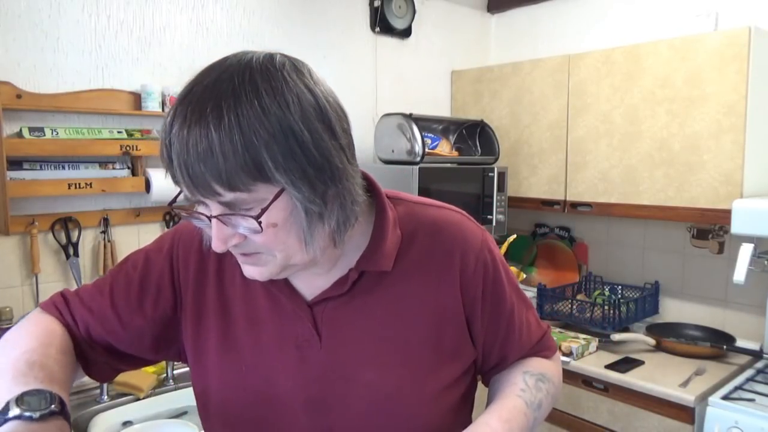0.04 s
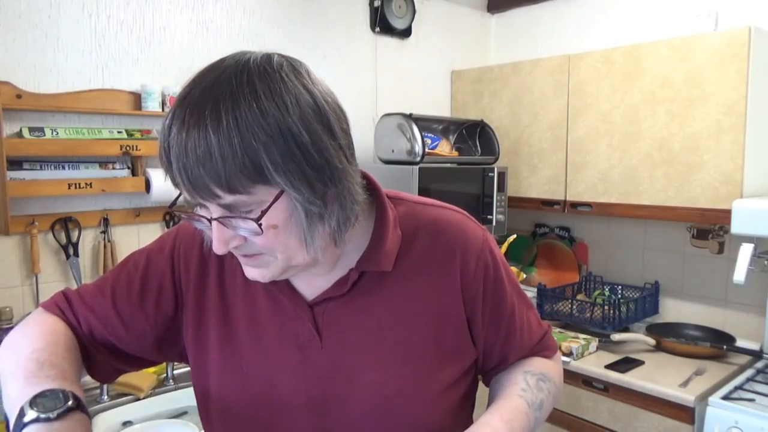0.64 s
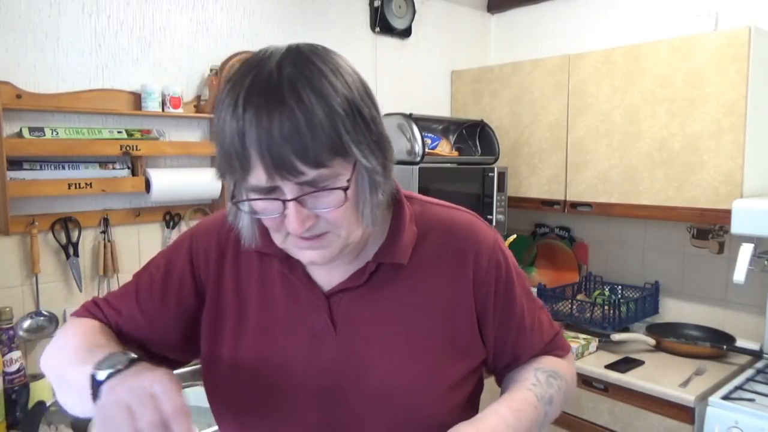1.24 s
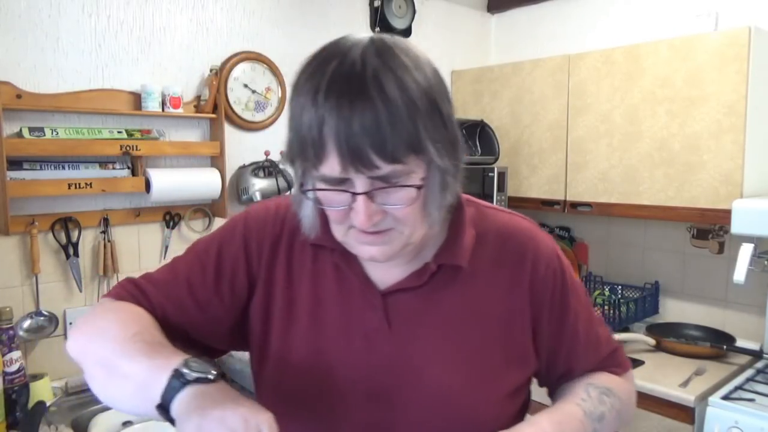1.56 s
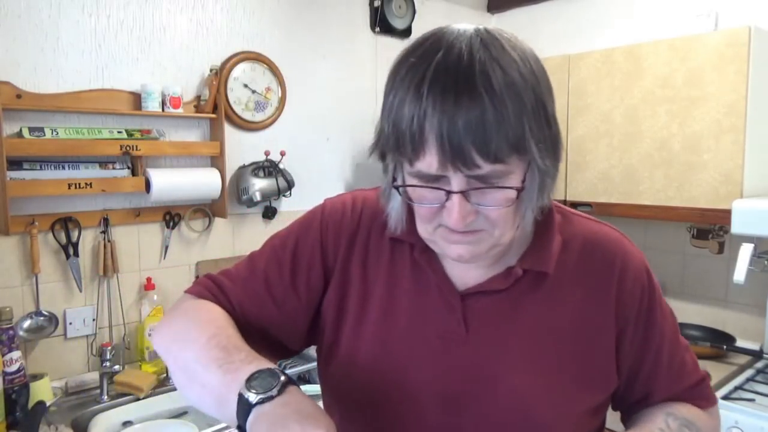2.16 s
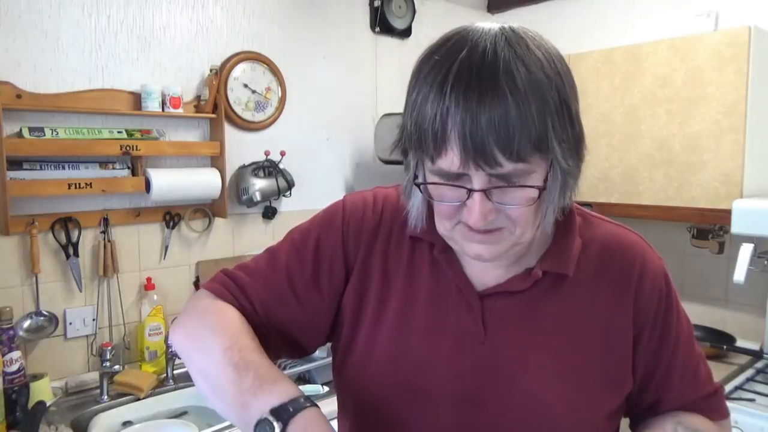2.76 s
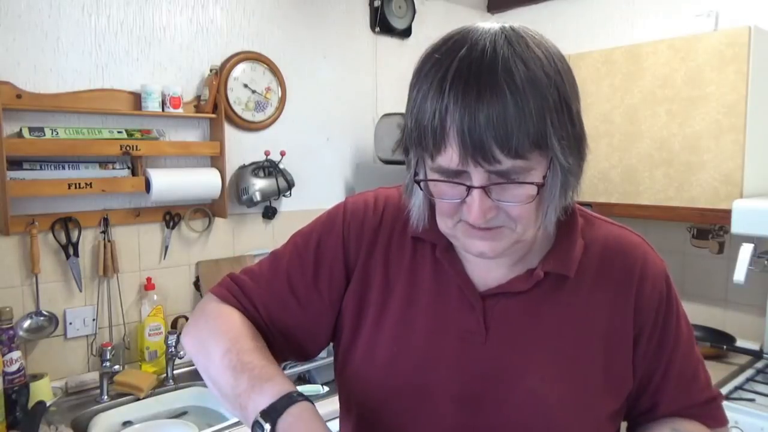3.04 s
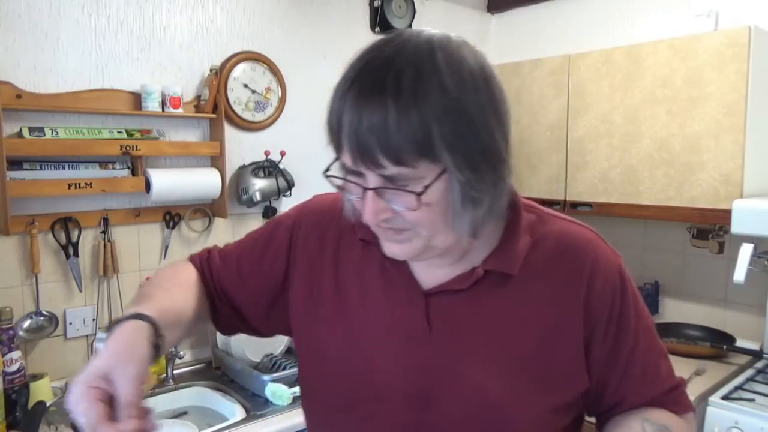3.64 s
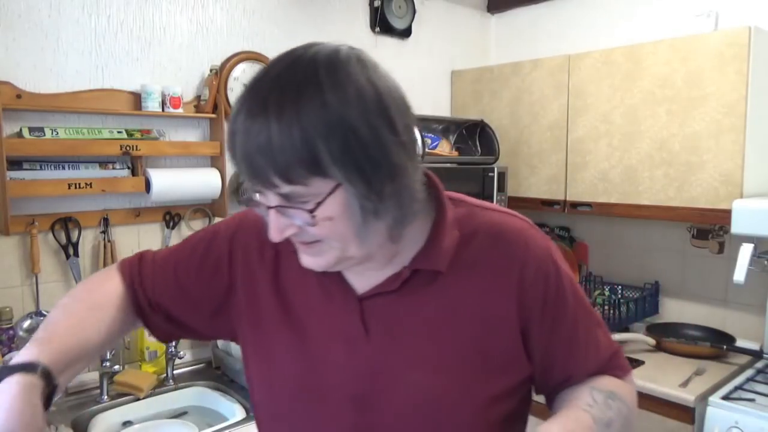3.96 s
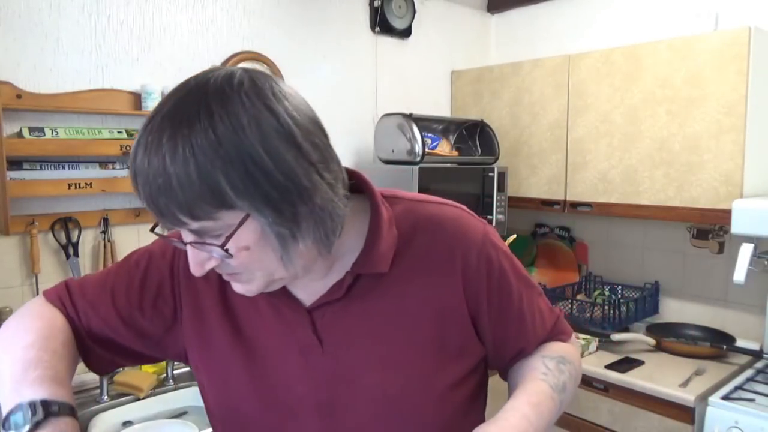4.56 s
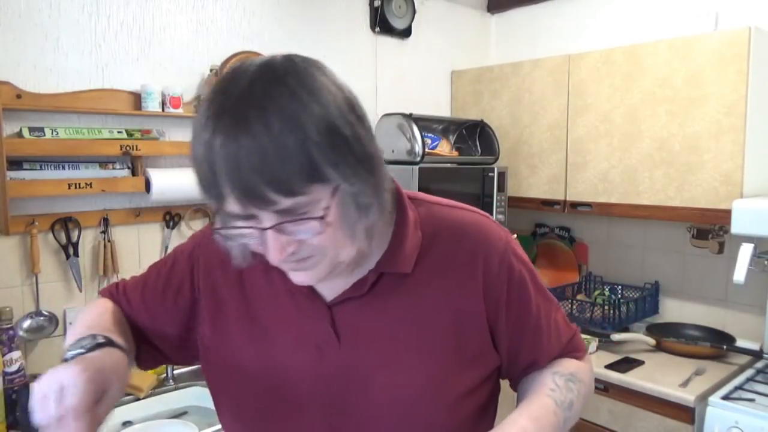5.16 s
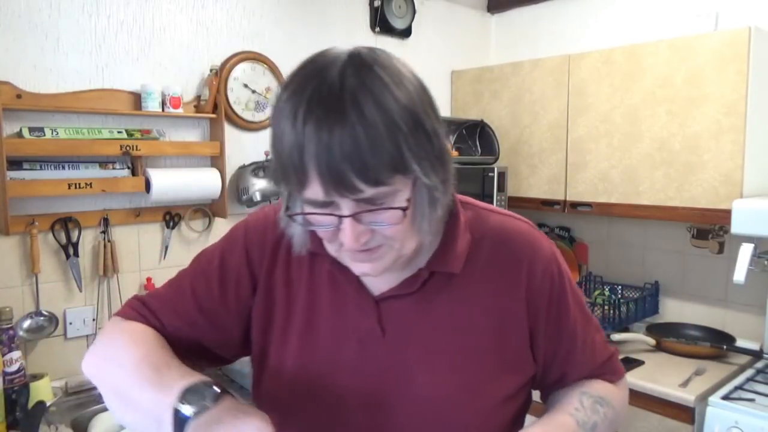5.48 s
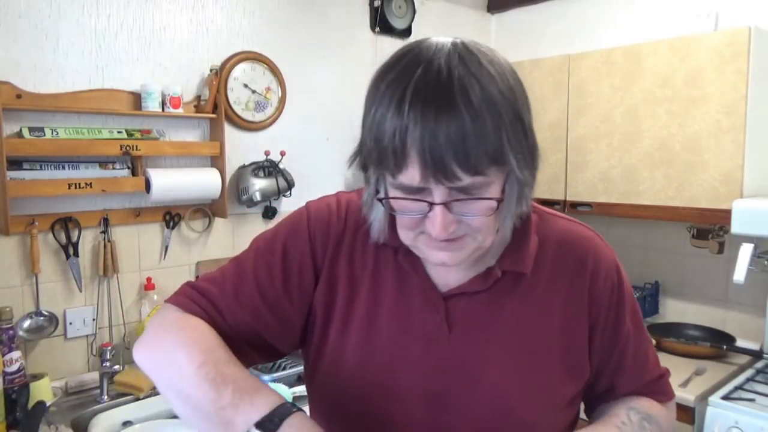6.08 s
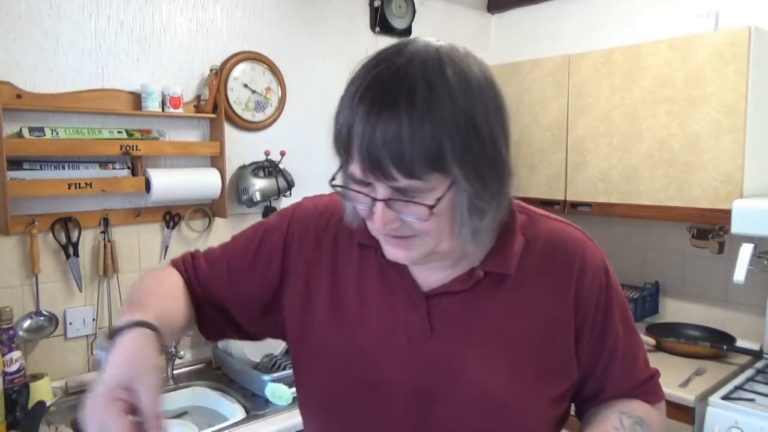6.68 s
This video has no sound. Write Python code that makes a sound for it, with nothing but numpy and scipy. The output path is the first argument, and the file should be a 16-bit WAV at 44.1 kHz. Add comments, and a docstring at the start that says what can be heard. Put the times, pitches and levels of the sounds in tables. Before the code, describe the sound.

Dishes are handled close to the microphone at a sink in a small tiled kitchen, over the constant hum and soft rush of an appliance fan. A dull, groaning slide of crockery comes first, followed by a sharp knock and a gritty scrape in the basin. Another slide leads into a ringing clink of cutlery. Near the end a dish clatters down with a spoon inside and scrapes briefly.

```python
"""Washing-up in a small tiled kitchen, over the mains hum and fan of an appliance.
Twice a piece of crockery is dragged closer; a dish knocks into the sink and scrapes along it,
and a piece of steel cutlery is dropped onto other cutlery. The hard walls ring briefly."""
import sys
import numpy as np
from scipy import signal
from scipy.fft import rfft, irfft, next_fast_len
from scipy.io import wavfile
from scipy.ndimage import map_coordinates

SR = 44100
rng = np.random.default_rng(int(sys.argv[2]) if len(sys.argv) > 2 else 0)


def to_wav(s):
    """Save 16-bit WAV."""
    ch = np.atleast_2d(s).T  # columns
    pcm = np.round(np.clip(ch, -1, 1) * 32767)  # PCM
    wavfile.write(sys.argv[1], SR, pcm.astype(np.int16))


N = 300759

# the dish against the sink: (Hz, dB, t60 s)
DISH = [(527, -56, 0.16), (600.6, 4.5, 0.36), (642, -6.5, 0.2), (693, -17, 0.12), (994, -12.5, 0.25), (1142, 5.5, 0.24),
        (1244, 0, 0.25), (1303, -5, 0.17), (1795, -9, 0.2), (1870, -6, 0.17), (1980, -6, 0.17), (2110, -7, 0.12),
        (2260, -2, 0.17), (2320, -11, 0.16), (2800, -17, 0.12), (3175, -9, 0.26), (3240, -10, 0.34),
        (4200, -20, 0.2), (4620, -7, 0.078), (4900, -13, 0.13)]
# the dish lands: (s, level dB, favoured Hz, rim crack dB, loss per rock dB, share of the full ring time)
KNOCKS = [(2.596, -12.5, 950, 6.5, 7, 0.19), (2.8189, -31.5, 1200, 2, 18, 0.19), (5.805, -12, 600, 8.5, 1.74, 0.54)]
CRACK = [(60, -50), (200, -29), (500, -18), (1500, -12), (2000, 10.5), (4000, 2.5), (6000, 5.5), (6800, -3.5), (8500, -6), (11000, -22)]  # the hard edge of a contact: (Hz, dB)
# steel cutlery: (Hz, dB, t60 s)
STEEL = [(1303, -34, 0.38), (2046, -26, 0.29), (2862, -19, 0.24), (3027, -26, 0.3), (3593, -22, 0.26),
         (3839, -24, 0.4), (3989, -28, 0.37), (4283, -27, 0.31), (4903, -26, 0.38), (5075, -23, 0.35),
         (5187, -23, 0.34), (5452, -22, 0.31), (5887, -21, 0.31), (6082, -19, 0.3), (6273, -19, 0.29),
         (6426, -22, 0.29), (6684, -27, 0.31), (6825, -27, 0.29), (7205, -23, 0.28), (7321, -24, 0.28),
         (7435, -25, 0.28), (7628, -28, 0.28), (8197, -27, 0.3), (8538, -23, 0.26), (8689, -24, 0.25),
         (9505, -30, 0.28), (9994, -26, 0.22), (10134, -26, 0.23)]  # fixed
# its free ends sing on: (Hz, dB, t60 s)
SING = [(3592, -48, 1.7), (3843, -46, 1.53), (6090, -42, 0.89), (8490, -53, .9)]
# steel meets steel: (s, level dB, favoured Hz, crack dB, share of the full ring time)
CLINKS = [(4.470, -45, 11000, 10.5, .2), (4.5154, -13, 4800, -5.5, 0.53)]
JANGLE = [(60, -60), (800, -10.5), (2500, -13), (4500, -1), (6200, -9), (11000, -5.5)]  # the tick of steel on steel: (Hz, dB)
# pushes of the dish along the sink: (s at its height, ring dB, hiss dB)
SCRAPES = [(2.773, -34, -42), (2.84, -36, -46.5), (2.93, -43.5, -53), (6.201, -44.5, -35.5), (6.288, -61, -43.5)]
HISS = [(1180, -32), (2000, -4), (2240, -21), (2460, -22), (3250, -15), (3510, -23), (4050, -2), (4510, -28),
        (4980, -4), (5430, 1.5), (6870, -9), (9470, 0), (11000, -27.5), (14300, -40), (22000, -120)]  # (Hz, dB)
# crockery dragged over the worktop: (s at its height, friction dB)
DRAGS = [(0.848, -35.5), (4.205, -32)]
DRAG_BODY = [(240, -55), (400, -15.5), (512, -8), (561, -15.5), (897, -10), (1060, -28), (1290, -13.5), (1590, -37),
             (1860, -29), (2010, -32), (4880, -57), (5340, -38.5), (6250, -36.5), (9000, -55), (11700, -85),
             (19800, -120)]  # (Hz, dB)
# the drag catches and a resonance groans: (s at its height, Hz, dB)
GROANS = [(0.867, 482, -25), (0.886, 735, -34), (0.936, 488, -32.5), (0.939, 735, -24.5), (0.94, 978, -36), (4.226, 514, -25)]
QUIET = [(1.1, 2.5), (3.1, 4.1), (5.0, 5.7)]
AIR = [(260, -33), (450, -4), (508, -1), (663, -10), (728, -4), (964, -13.5), (1130, -8), (1500, -15), (1930, -14),
       (3390, -20), (3930, -22.5), (4310, -20.5), (6360, -21.5), (10400, -33), (11000, -54), (14300, -60), (22000, -120)]  # the fan's rush: (Hz, dB)
AIR_DB = -49
RUMBLE = [(25, -22), (40, -25), (60, -6), (77, 0.5), (130, -2.5), (200, -5.5), (300, -14.5), (450, -6), (600, -33)]  # (Hz, dB)
CASING = [(245.4, 12, -55.5), (303.6, 9.5, -50), (339.6, 21.4, -44.5), (388, 18.7, -42.5), (1115, 59, -61)]  # the appliance's panels: (Hz, width Hz, dB)
KITCHEN = [(200, 0.65), (1000, 0.26), (4000, 0.3), (10000, 0.29)]  # (Hz, t60 s)
TOP_HZ = 11050  # fixed
TIME = np.arange(N) / SR
# a spoon that jumps in the dish: (Hz, dB, t60 s)
SPOON = [(6160, -9, 0.14), (6200, 0, 0.21), (6600, -13, 0.15), (7130, -8, 0.14), (7500, -7, 0.16), (8720, -6.5, 0.15),
         (10930, -11, 0.098)]
SINK = [(560, -9, 0.13), (580, -5.5, 0.44), (1108, -4, 0.22), (1160, -13, 0.12), (1300, -5.5, 0.14), (1815, -5, 0.15), (1870, -15, 0.12), (2720, -13.5, 0.16), (3130, -16, .1)]  # the scraped basin: (Hz, dB, t60 s)
# faint rubs of hands and sleeves: (s at its height, Hz, dB)
RUBS = [(0.31, 6650, -58.5), (0.88, 3300, -55), (1.22, 7200, -61), (1.78, 3900, -59), (5.23, 8040, -63), (5.45, 7850, -59)]
RIM_DB, RIM_HZ, RIM_LIFE, RIM_LEAD_S = -13, 4470, 0.24, .0025  # the rim touches just before the body
SETTLE_S, SETTLE_DB, SETTLE_LIFE = .097, -7, 0.98  # a last soft contact, after which the dish rings freely
PUSH_RISE_DB_PER_S, PUSH_FALL_DB_PER_S = 181, 290
SQUEAL = [(5480, 36, 3), (5870, 41, 4), (6630, 30, -1.5), (7200, 110, 0), (8140, 93, -12), (9800, 97, -9),
          (10700, 59, -3)]  # thin steel tones in the scrape: (Hz, width Hz, dB)
DRAG_RISE_DB_PER_S, DRAG_FALL_DB_PER_S = 432, 114
GROAN_HALF_S = 0.015
RUB_HALF_S = .027
ROCK_S, ROCK_GROWTH, ROCK_DB, ROCK_LIFE = .0145, 0.89, -1.7, .33  # first rocking gap, next gap over it, level against the landing, share of ring time
# the spoon jumps: (s, level dB, favoured Hz, crack dB, share of the full ring time)
TAPS = [(2.8195, -35.5, 8700, 7.5, .35), (5.8048, -17.5, 6200, 1.5, 0.37)]
GRAZE_LEAD_S, GRAZE_CRACK_DB, GRAZE_LIFE = .0052, -10, 0.46  # things brush just before they hit
GRAZE_DB = -22  # fixed
BODY_CRACK_DB, ROCK_CRACK_DB = -11.5, -9  # the body lands softly; it rocks on its hard foot


def amp(db):
    """Decibels to gain."""
    return 10 ** (np.asarray(db) / 20)


def unit(x):
    """Scaled to rms 1."""
    return x / np.sqrt(np.mean(x ** 2) + 1e-20)


def along(points, hz):
    """(Hz, value) points read on a log axis."""
    f, v = np.transpose(points)
    return np.interp(np.log(hz + 1), np.log(f + 1), v)


def filtered(x, response):
    """x times a response of frequency."""
    n = x.shape[-1]
    m = next_fast_len(n + SR // 4)
    return irfft(rfft(x, m) * response(np.fft.rfftfreq(m, 1 / SR)), m)[..., :n]


def noise(spectrum, size=N):
    """Coloured noise of rms 1."""
    return unit(filtered(rng.standard_normal(size), lambda hz: amp(along(spectrum, hz))))


def wobble(rate):
    """A smooth random curve, rate knots a second."""
    return map_coordinates(rng.standard_normal(int(N * rate / SR) + 4), [TIME * rate])




def add(track, s, sound):
    """Mix a sound in at time s."""
    part = track[round(s * SR):][:len(sound)]
    part += sound[:len(part)]


def ring(modes, life):
    """One second of fading modes, starting at rms 1, a little different for each blow."""
    hz, db, t60 = np.transpose(modes)[:, :, None]
    t = np.arange(SR) / SR
    size = amp(db + .5 * rng.standard_normal(hz.shape))
    waves = np.sin(2 * np.pi * (hz * t + rng.random(hz.shape))) * np.exp(-np.log(1000) * t / (t60 * life))
    return np.sum(size * waves, axis=0) * np.sqrt(2 / np.sum(size ** 2))


def strikes(contacts, modes, crack_colour, slope_db, chatter_db, chatter_t60, width_hz, crack_t60):
    """Each contact cracks, chatters and leaves the modes ringing; a firm grip shortens their life."""
    out, t = np.zeros(N), np.arange(SR) / SR
    fade = lambda t60: np.exp(-np.log(1000) * t / t60)
    for s, db, centre_hz, crack_db, life in contacts:
        struck = favour(modes, centre_hz, slope_db)
        crack = amp(crack_db) * noise(crack_colour, size=SR) * fade(crack_t60)
        rattle = amp(chatter_db) * chatter(struck, width_hz) * fade(chatter_t60 * life)
        add(out, s, amp(db) * (ring(struck, life) + rattle + crack) * (1 - fade(0.0013)))
    # small objects radiate no bass
    return signal.sosfilt(signal.butter(2, 220, "highpass", fs=SR, output="sos"), out)


def dish():
    """The dish lands in the sink and rocks to rest; twice a spoon rattles in it."""
    contacts = [contact for knock in KNOCKS for contact in landing(*knock)]
    jumps = [softening(rebounds(tap, gap_s=.02, growth=1.8, loss_db=5, count=2), step_db=7) for tap in TAPS]
    china = strikes(contacts, DISH, CRACK, slope_db=3.0, chatter_db=-6.5, chatter_t60=0.29, width_hz=24, crack_t60=0.052)
    spoon = strikes(sum(jumps, []), SPOON, JANGLE, slope_db=7, chatter_db=-2.5, chatter_t60=0.17, width_hz=57, crack_t60=0.045)
    return amp(1.5) * china + amp(-0.5) * spoon


def cutlery():
    """Steel falls on steel and rebounds twice; the hardest blow sets the free ends singing."""
    falls = [softening(rebounds(clink, gap_s=.016, growth=1.3, loss_db=4.5, count=2), step_db=3) for clink in CLINKS]
    s, db, hz = max(CLINKS, key=lambda row: row[1])[:3]
    contacts = sum(falls, []) + [graze(s, db - 5, hz)]
    out = amp(-0.5) * strikes(contacts, STEEL, JANGLE, slope_db=0.7, chatter_db=-1, chatter_t60=0.35, width_hz=47, crack_t60=0.085)
    add(out, s, amp(-43.5) * ring(SING, life=0.99))
    return out


def scrapes():
    """Tiny slips keep the basin ringing under a gritty hiss and thin steel tones."""
    pushes = [amp([[ring_db], [hiss_db]]) * push(s, PUSH_RISE_DB_PER_S, PUSH_FALL_DB_PER_S) for s, ring_db, hiss_db in SCRAPES]
    ring_gain, hiss_gain = np.max(pushes, axis=0)
    slips = amp(3.1 * wobble(250))
    body = unit(signal.fftconvolve(slips * rng.standard_normal(N), ring(SINK, life=0.57))[:N])
    grit = unit(slips * noise(HISS))
    squeal = unit(sum(amp(db + 4.7 * wobble(22)) * band(hz, 1.5 * width) for hz, width, db in SQUEAL))
    return amp(2.0) * ring_gain * body + hiss_gain * (amp(-4.0) * grit + amp(-2.5) * squeal)


def drags():
    """Dull friction that starts quickly, eases off and briefly locks onto low resonances."""
    gain = sum(amp(db) * push(s, DRAG_RISE_DB_PER_S, DRAG_FALL_DB_PER_S) for s, db in DRAGS)
    out = amp(2.5) * gain * unit(noise(DRAG_BODY) * amp(1.9 * wobble(110)))
    for s, hz, db in GROANS:
        grip = amp(db) / (1 + ((TIME - s) / GROAN_HALF_S) ** 2)
        out += grip * np.sqrt(2) * np.sin(2 * np.pi * hz * TIME + 0.27 * wobble(80))
    return out


def appliance():
    """Twice-mains hum, a rumbling fan and the panels that it shakes."""
    hum = amp(-48.0 + 1.3 * wobble(11)) * np.sqrt(2) * np.sin(2 * np.pi * 100 * TIME + 0.23 * wobble(2.9))
    panels = sum(amp(db) * band(hz, width) for hz, width, db in CASING)
    return hum + panels + amp(-48.0) * noise(RUMBLE) + amp(AIR_DB - 0.5) * noise(AIR)


def kitchen(x, gap):
    """The walls' answer, each frequency dying at its own speed."""
    hz, t, z = signal.stft(rng.standard_normal(SR // 2), SR, nperseg=256)
    tail = signal.istft(z * np.exp(-np.log(1000) * t / along(KITCHEN, hz)[:, None]), SR, nperseg=256)[1]
    return signal.fftconvolve(np.pad(x, (int(abs(gap) * SR), 0)), tail / np.linalg.norm(tail))[:N]


def chatter(modes, width_hz):
    """One second of rattling contact: each mode is smeared into a narrow band."""
    hz, db, _ = np.transpose(modes)[:, :, None]
    bands = lambda f: np.linalg.norm(amp(db) / (1 + ((f - hz) / width_hz) ** 2), axis=0)
    return unit(filtered(rng.standard_normal(SR), bands))


def swell(s, half):
    """A bell-shaped gain around time s."""
    return np.exp(-.5 * ((TIME - s) / half) ** 2)


def band(hz, width_hz):
    """Noise of rms 1 in one resonance."""
    return unit(filtered(rng.standard_normal(N), lambda f: 1 / (1 + ((f - hz) / width_hz) ** 2)))


def favour(modes, centre_hz, slope_db):
    """Where and how hard a blow lands favours the modes near one frequency."""
    hz, db, t60 = np.transpose(modes)
    return np.transpose([hz, db - slope_db * abs(np.log2(hz / centre_hz)), t60])


def rubs():
    """Soft, short swishes of handling."""
    return sum(amp(db) * swell(s, RUB_HALF_S) * band(hz, .07 * hz) for s, hz, db in RUBS)


def push(s, rise_db_per_s, fall_db_per_s):
    """The gain of a push that builds up until time s and then slackens."""
    return amp(-np.maximum(rise_db_per_s * (s - TIME), fall_db_per_s * (TIME - s)))


def rebounds(first, gap_s, growth, loss_db, count):
    """A contact and its rebounds, each weaker than the one before."""
    s, db, *touch = first
    delays = np.cumsum([0] + [gap_s * growth ** k for k in range(count)])
    return [(s + delay, db - loss_db * k, *touch) for k, delay in enumerate(delays)]


def landing(s, db, hz, rim_crack_db, loss_db, life):
    """The dish brushes the sink, the rim clicks, the body lands, rocks quickly and settles."""
    rim = (s, db + RIM_DB, RIM_HZ, rim_crack_db, RIM_LIFE)
    body = (s + RIM_LEAD_S, db, hz, BODY_CRACK_DB, life)
    first_rock = (s + RIM_LEAD_S + ROCK_S, db + ROCK_DB - loss_db, hz, ROCK_CRACK_DB, ROCK_LIFE)
    rocks = rebounds(first_rock, ROCK_S, ROCK_GROWTH, loss_db, count=3)
    settle = (s + SETTLE_S, rocks[-1][1] + SETTLE_DB, hz, BODY_CRACK_DB, SETTLE_LIFE)
    return [graze(s, db, hz), rim, body, *rocks, settle]


def graze(s, db, hz):
    """The light brush that comes before a blow at time s."""
    return (s - GRAZE_LEAD_S, db + GRAZE_DB, hz, GRAZE_CRACK_DB, GRAZE_LIFE)


def softening(contacts, step_db):
    """Steel meets more gently with every rebound, so its crack fades faster than its ring."""
    return [(s, db, hz, crack_db - step_db * k, life) for k, (s, db, hz, crack_db, life) in enumerate(contacts)]


def scene():
    """Two close microphones: nearly mono, with a little width from the walls and the air."""
    knocks, clinks, scraping, dragging = dish(), cutlery(), scrapes(), drags()
    to_walls = amp(-5.5) * knocks + amp(-3.0) * clinks + amp(-6.5) * scraping + amp(-8) * dragging
    mid = knocks + clinks + scraping + dragging + rubs() + kitchen(to_walls, gap=.005) + appliance()
    # short waves differ more between the two microphones
    spread = filtered(kitchen(to_walls, gap=0.0019), lambda hz: amp(along([(500, -20.0), (2000, -17.0), (8000, -9.5)], hz)))
    side = spread + amp(-66.0) * noise(AIR) + amp(-62.5) * noise(RUMBLE)
    return np.array([mid + side, mid - side]) * amp([[.4], [-.4]])


def record(dry):
    """The camera keeps nothing above its band limit."""
    return filtered(dry, lambda hz: 1 / np.sqrt(1 + (hz / TOP_HZ) ** 240))  # fixed


dry = scene()
out = record(dry)
to_wav(out)
```